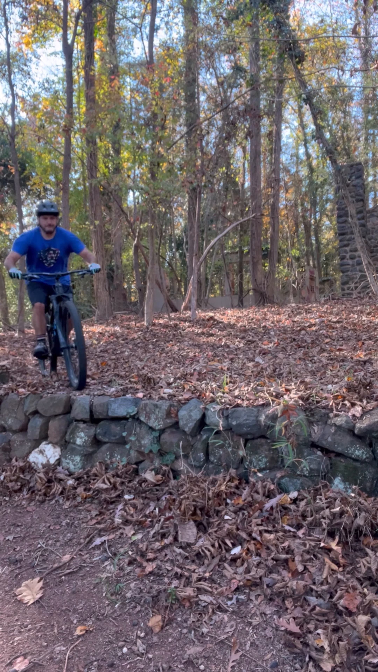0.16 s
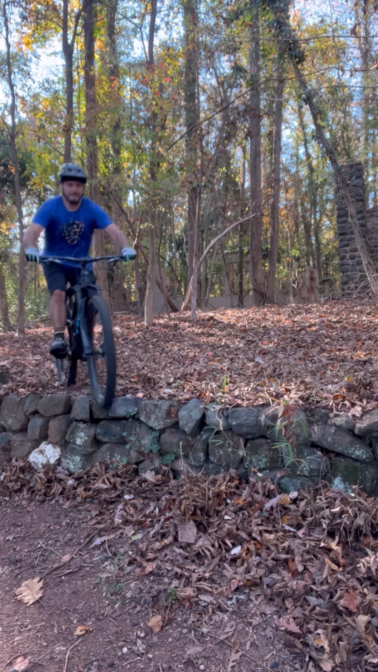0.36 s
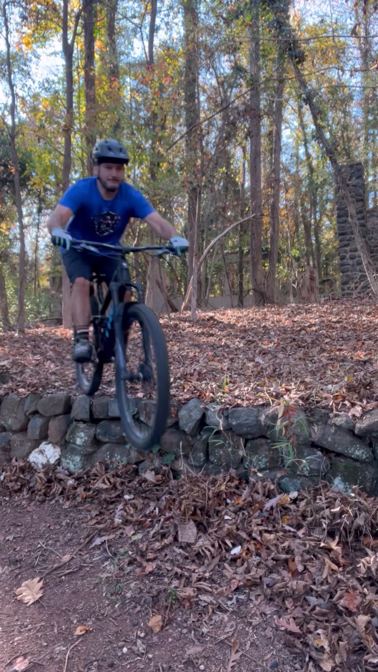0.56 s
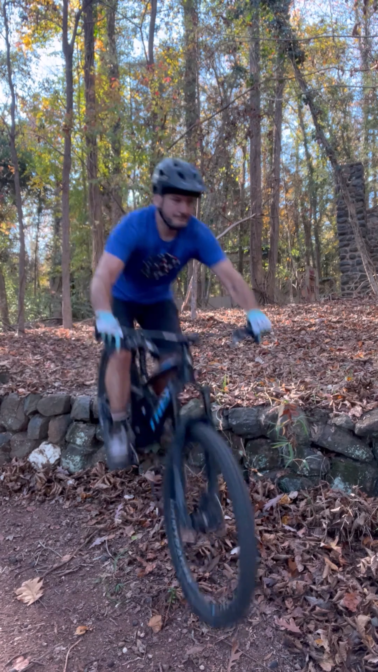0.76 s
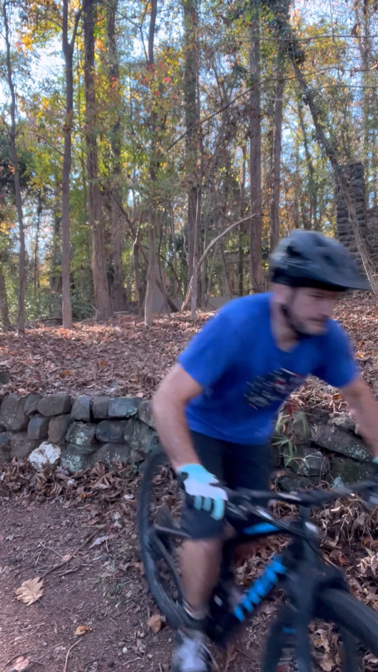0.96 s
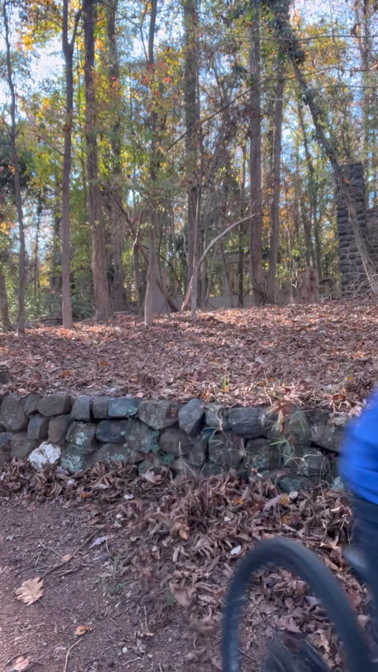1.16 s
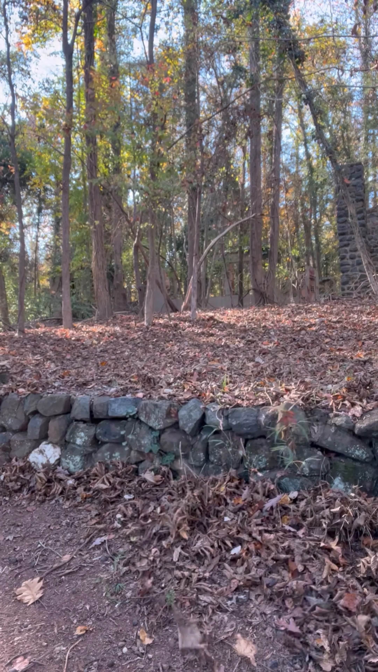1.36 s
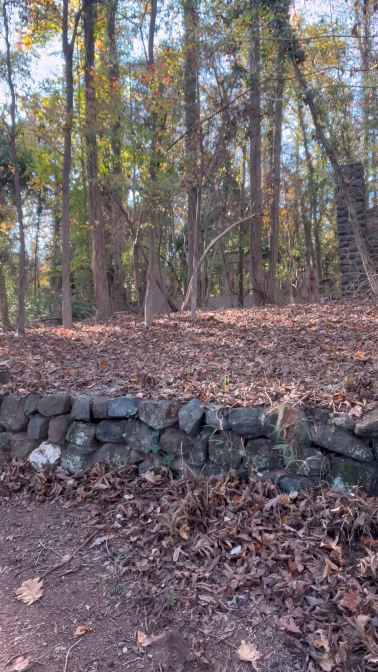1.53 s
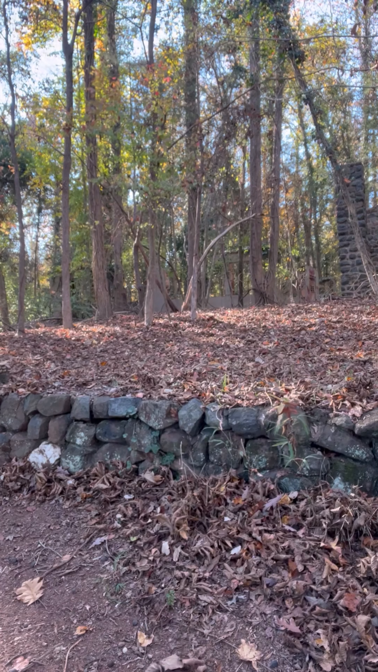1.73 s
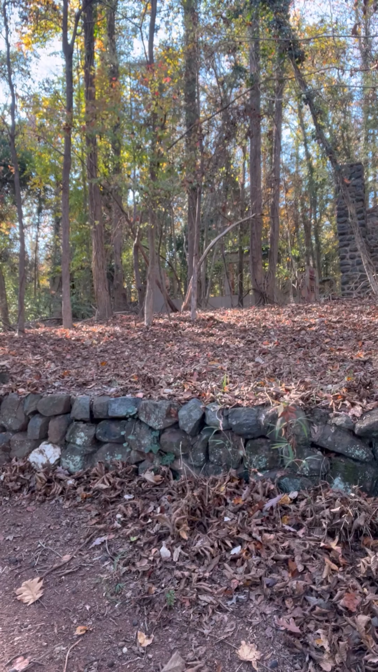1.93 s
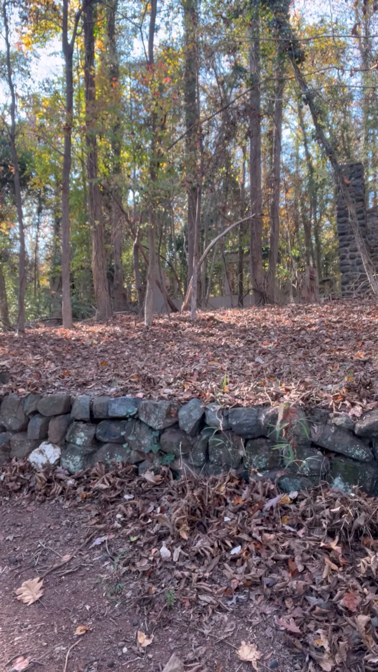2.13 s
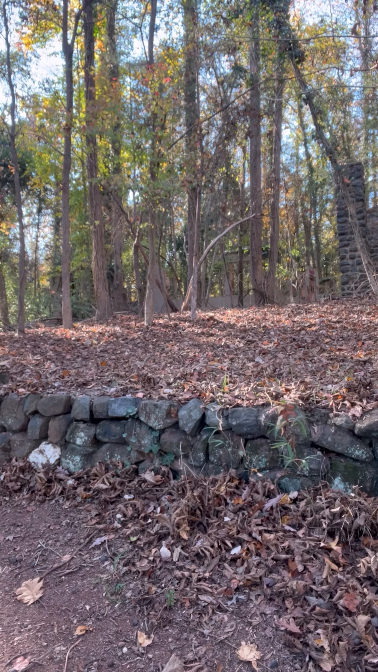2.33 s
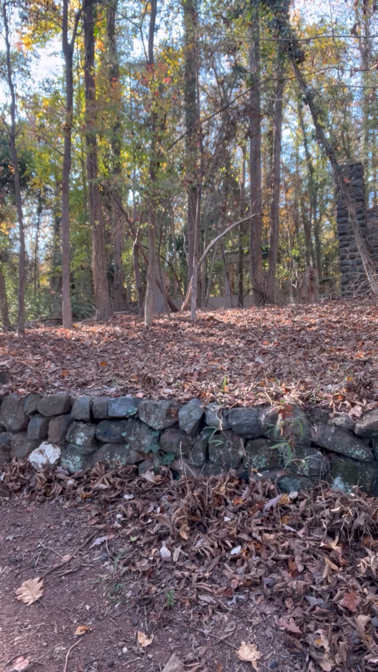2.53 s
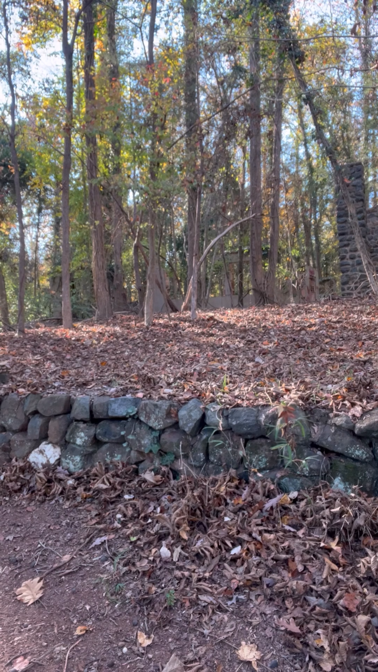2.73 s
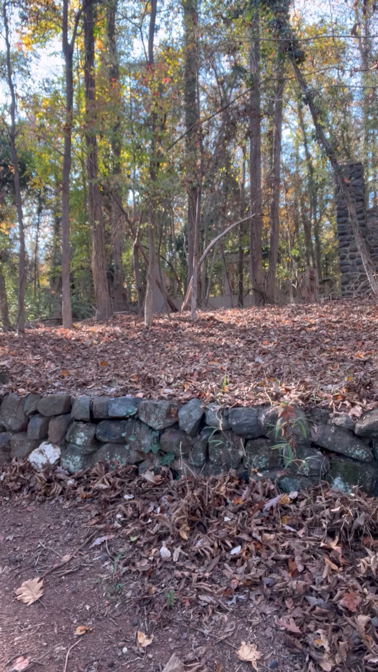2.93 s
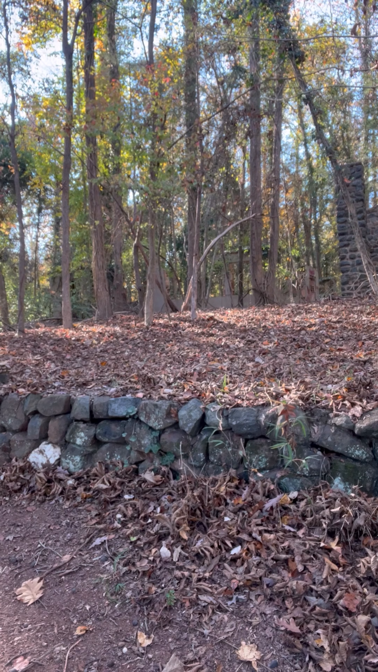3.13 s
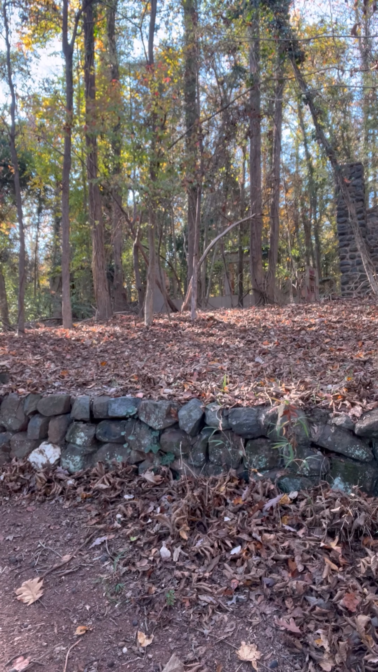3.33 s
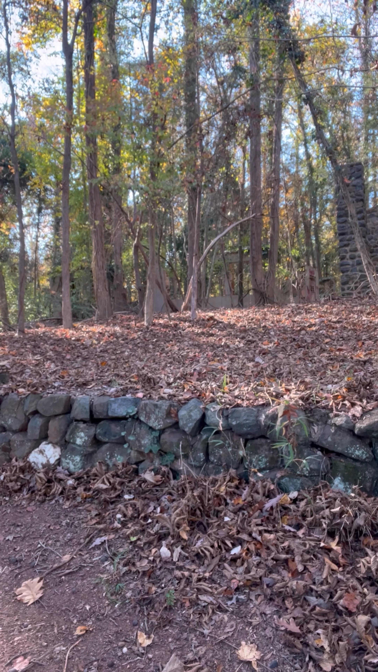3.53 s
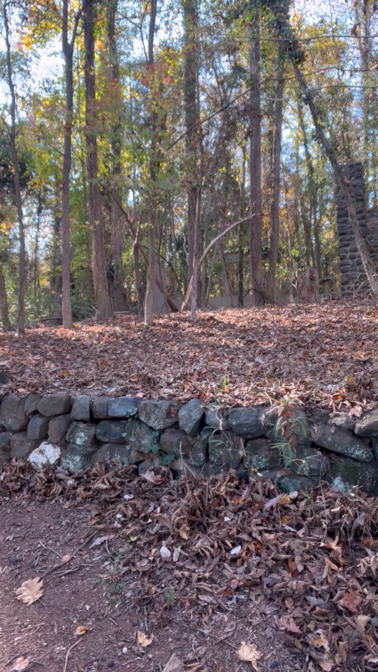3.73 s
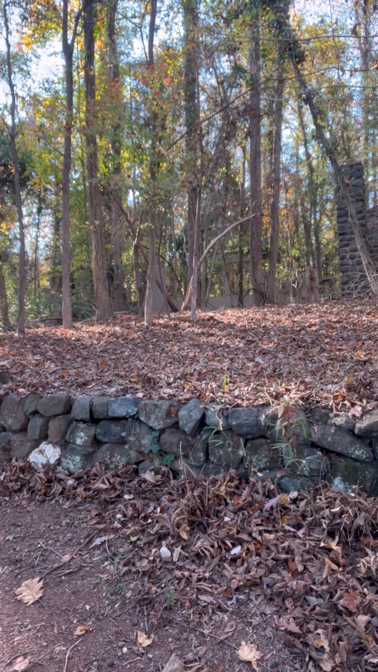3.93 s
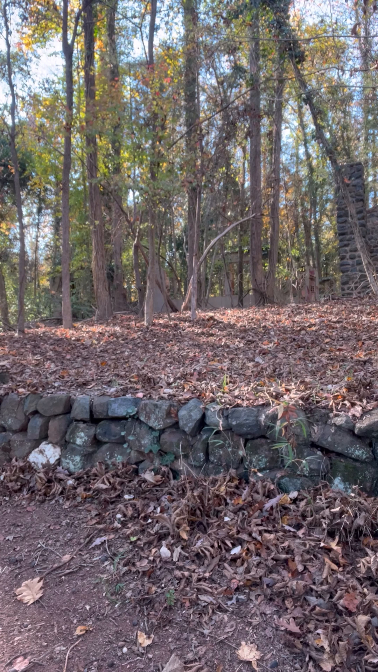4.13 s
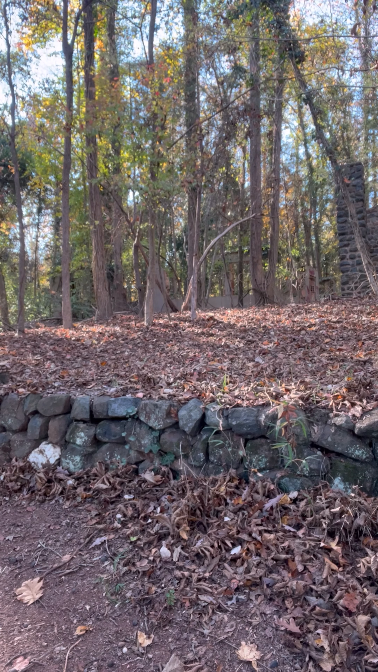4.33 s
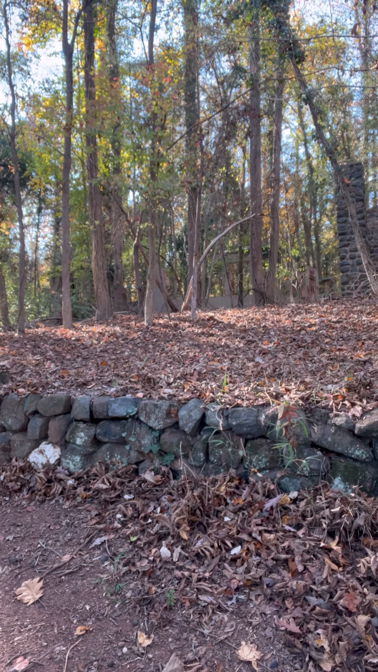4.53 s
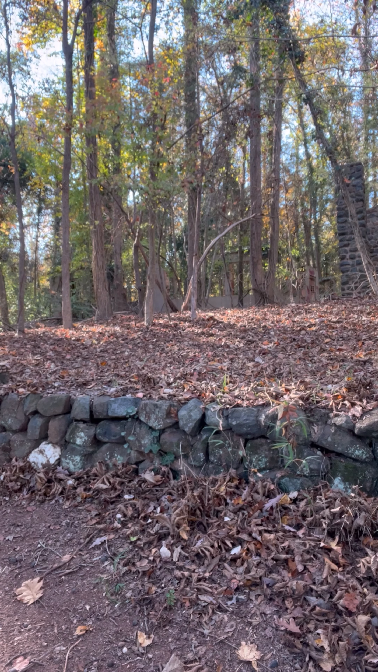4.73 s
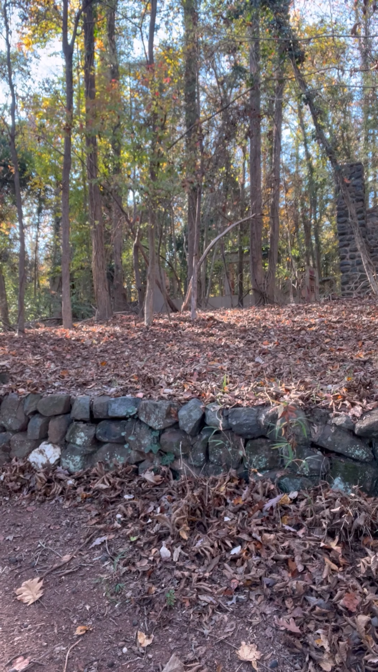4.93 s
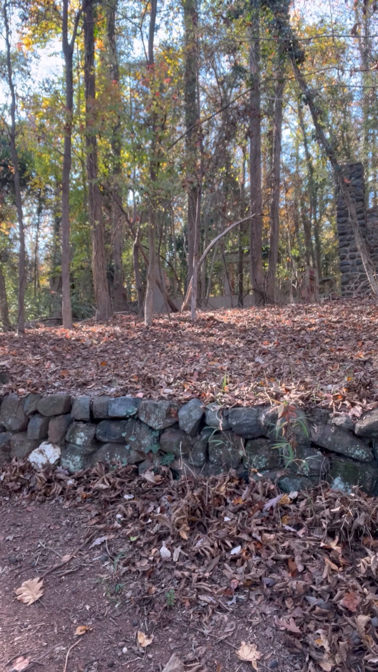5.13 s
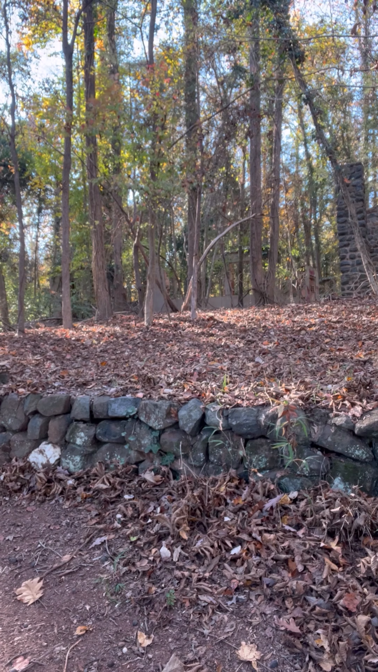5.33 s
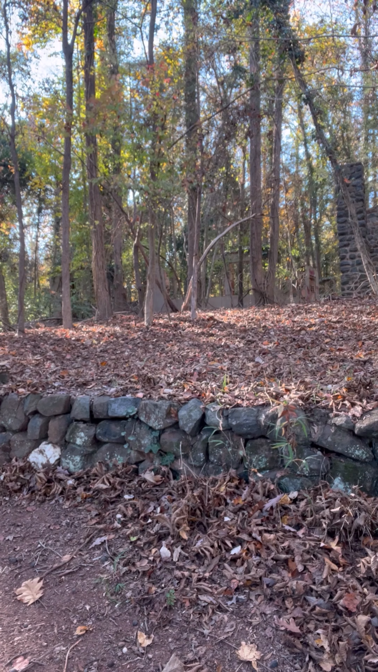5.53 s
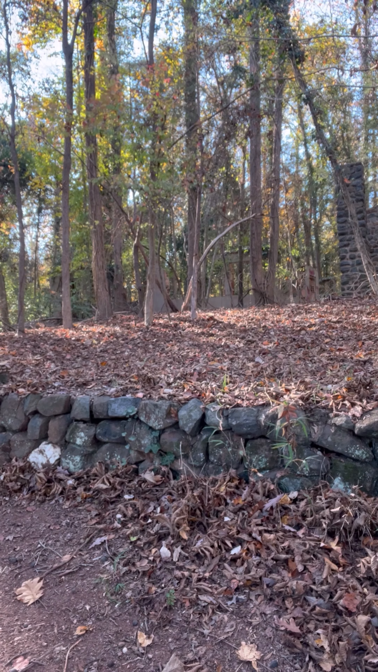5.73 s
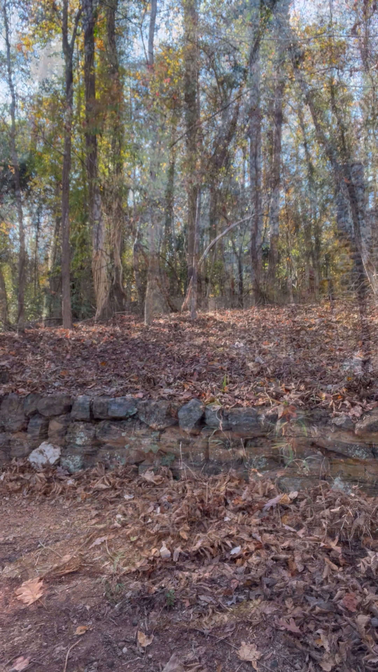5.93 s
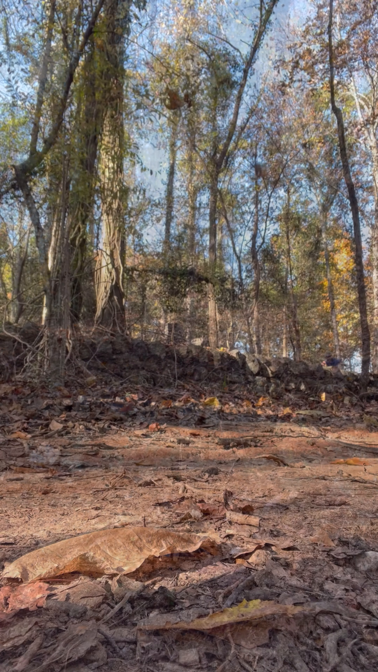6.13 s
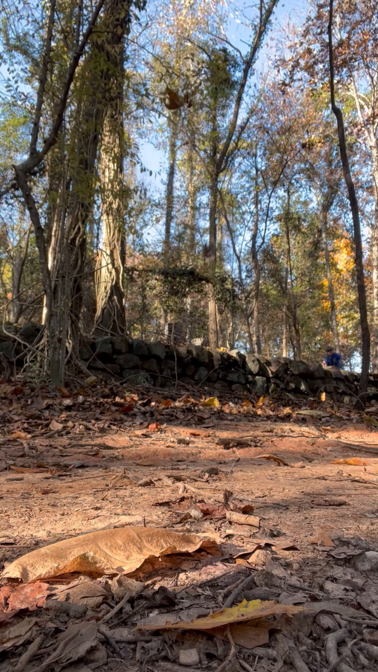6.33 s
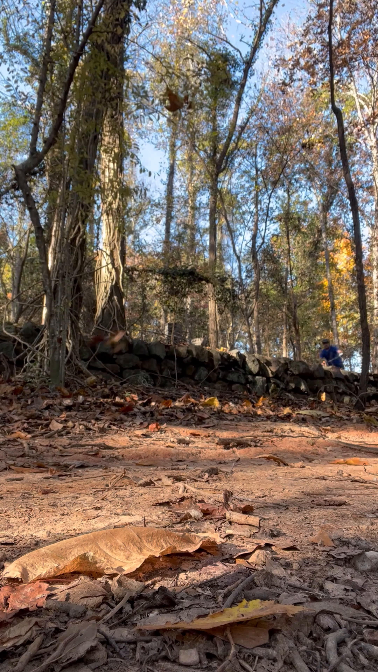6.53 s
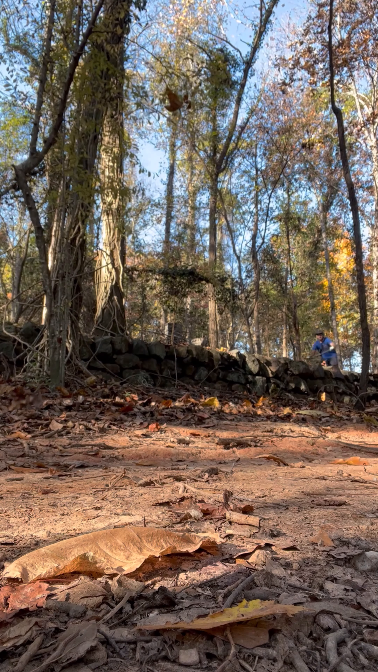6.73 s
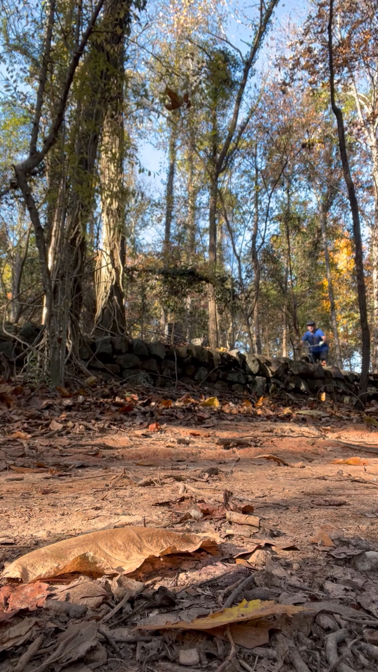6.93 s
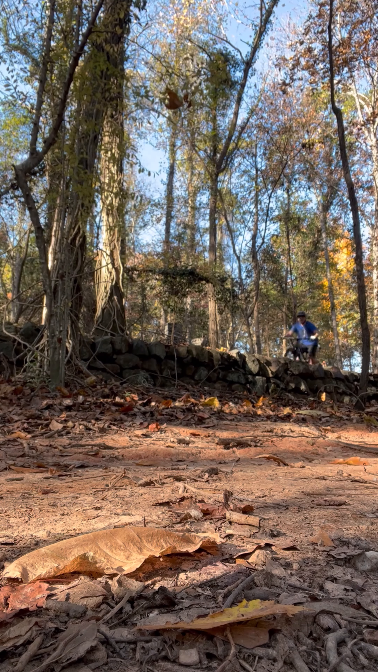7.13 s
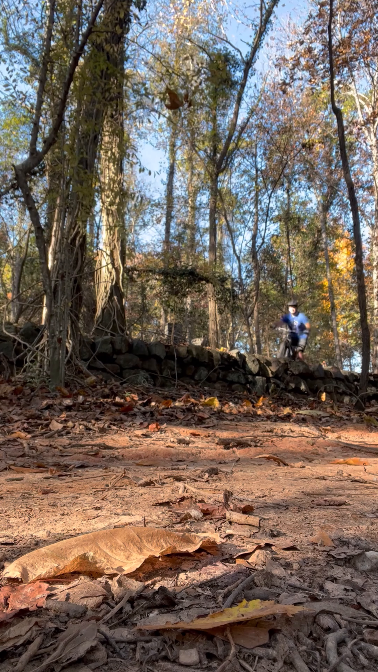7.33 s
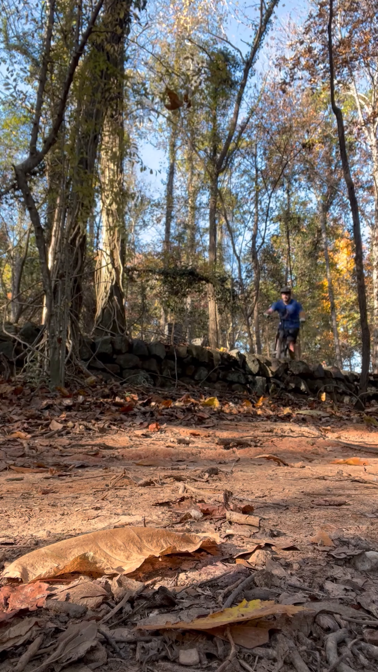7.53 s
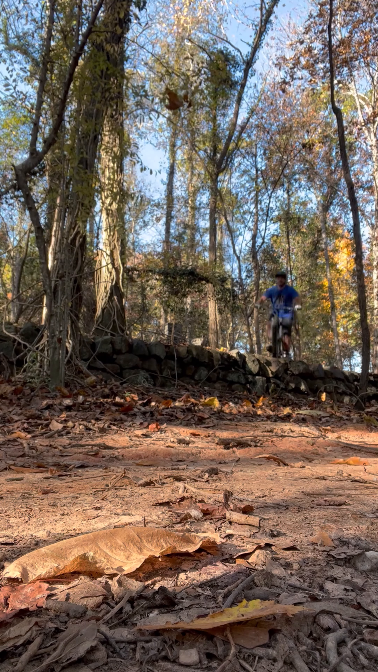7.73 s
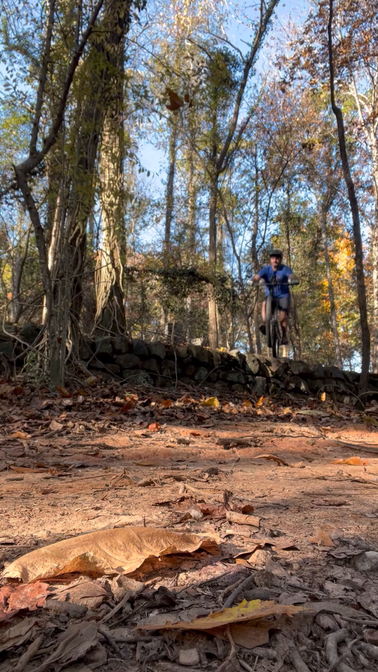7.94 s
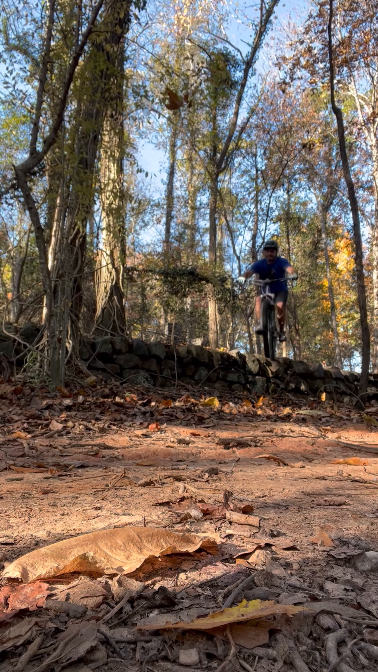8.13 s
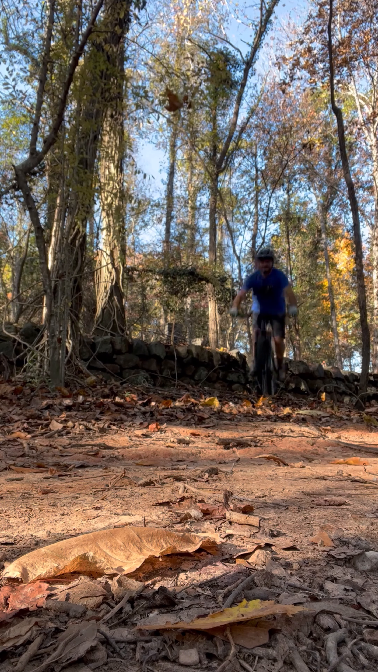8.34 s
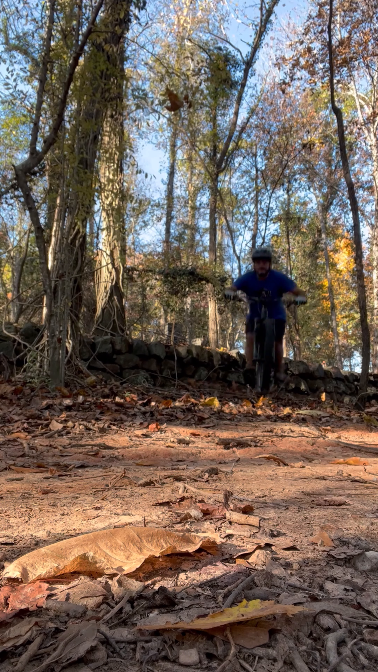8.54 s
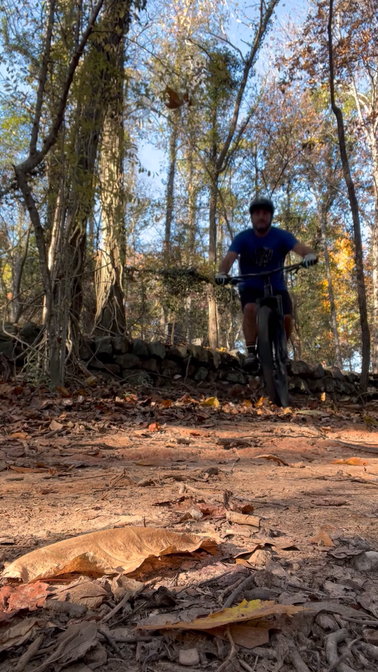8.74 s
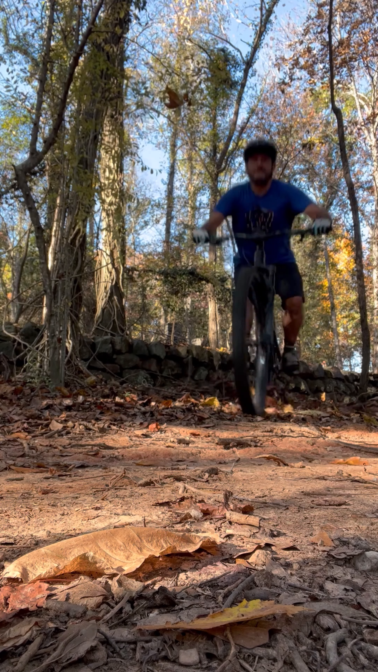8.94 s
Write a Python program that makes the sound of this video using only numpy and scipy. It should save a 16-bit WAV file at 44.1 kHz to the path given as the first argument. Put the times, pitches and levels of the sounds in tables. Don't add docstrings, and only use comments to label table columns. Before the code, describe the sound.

In an open wood, bike tyres rush through dry leaves from the start, crackling in swells near 0.15 and 0.4 seconds. At about 0.9 the bike drops off a stone wall: sticks snap, then a short deep thud lands at 0.95 with a dense clatter of chain, frame and stones until roughly 1.6. Rolling recedes, with a soft bump at 1.9 and small snaps around 2.4 and 2.75. Distant low traffic lingers, its engine hum growing towards 6, with very faint chirps at 3.5 and 4 to 4.8. Around 6 the perspective blends to ground level: a quiet, smooth leaf hiss, a sudden rustle at 6.7, and low wind buffets, strongest near 7.3. From 8.4 tyres plough into leaves close by in coarse, uneven crunches, with hollow tyre bumps and bright snaps at 8.8 to 8.95, ending at their loudest near 9.

```python
import sys
import numpy as np
from scipy import signal
from scipy.fft import rfft, irfft, next_fast_len
from scipy.io import wavfile
from scipy.ndimage import uniform_filter1d

SR = 44100
rng = np.random.default_rng(int(sys.argv[2]) if len(sys.argv) > 2 else 0)


def field_ratio(decibels):
    return 10 ** (np.asarray(decibels, dtype=float) / 20)


def persist_wave(psi):
    counts = np.round(np.clip(psi, -1, 1) * 32767).astype(np.int16)
    wavfile.write(sys.argv[1], SR, np.atleast_2d(counts).T)


N = 395577
SECONDS = np.arange(N) / SR
FILTER_SIZE = next_fast_len(N)

# pitch_hz, likeness_0_to_1, right_lead_radians, left_over_right_db
PORTS_NEAR = [(40, 0.8, -0.01, 0.3), (550, 0.6, 0.4, 1.2), (1800, 0.55, 1.3, 4.2), (2800, 0.25, 2.5, 1.2),
              (3100, 0.42, 3.3, 1.4), (3600, 0.26, 5.2, 1.6), (6000, 0.61, 5.11, 0.3),
              (9250, 0.83, 3.14, 0.0), (16000, 0.55, -1.2, 0.3)]
PORTS_AWAY = [(40, 0.84, -0.05, 0.0), (280, 0.59, -0.53, 1.2), (550, 0.55, -2.6, 2.8),
              (1800, 0.5, -4.5, 4.2), (3400, 0.25, -2.6, -1.2), (6000, 0.6, -1.22, -0.3),
              (9250, 0.72, -3.14, 0.0), (13400, 0.65, -6.2, 0.3), (16000, 0.34, -6.33, -0.2)]
PORTS_GROUND = [(40, 0.83, -0.25, -0.4), (950, 0.49, -0.75, 0.2), (2100, 0.22, -1.99, -1.4),
                (2800, 0.07, -4.33, 0.3), (3600, 0.27, -5.07, 0.4), (6000, 0.63, -4.13, -0.2),
                (7500, 0.33, -3.1, 0.0), (9000, 0.63, -1.8, 0.0), (13400, 0.62, 1.6, 0.0),
                (16000, 0.3, 2.4, 0.2)]
# start_s, end_s
TURN_AWAY = (1.63, 1.696)

# time_s, nearness_db, hollow_note_hz, brightness_db
RIDE = [(0.0, -79, 1550, 2), (.5, -53.5, 1590, 5.5), (.62, -60, 1730, 10), (.89, -50, 1720, 6),
        (1.13, -52, 1840, -12), (1.22, -47.5, 1590, -3), (1.28, -49.5, 2340, -13), (1.52, -48, 2320, 9),
        (1.62, -53, 2680, -1), (1.75, -55.5, 2630, 3.5), (2.4, -58.5, 2470, -2), (3.2, -63.5, 2100, -2),
        (3.65, -74, 2030, -2), (4.3, -74, 2020, -18), (4.55, -90, 2024, -9.5), (5.75, -90, 2020, -8)]
# peak_s, peak_db, rise_s, fall_s, brightness_db
DRIFTS = [(.156, -40.5, 0.4, 0.085, 0.5), (.268, -51, 0.017, .05, -17), (.426, -38.5, 0.11, 0.051, 1),
          (.624, -49.5, 0.021, 0.087, -1.5), (.904, -39, 0.0034, .05, -9.5), (.926, -29, 0.008, .14, 1),
          (1.21, -43, 0.092, .05, -3), (1.396, -39, 0.21, 0.15, 6.5), (1.548, -46.5, 0.027, .04, -19.5),
          (1.83, -53, 0.11, .2, -13), (2.43, -55, 0.049, 0.076, -1.5), (2.75, -54, 0.033, 0.077, -11),
          (3.79, -67.5, 0.055, .12, -1), (4.06, -75, .1, 0.18, 2.5), (4.48, -72, 0.093, .03, -4),
          (5.1, -81, .05, .07, 1)]
# pitch_hz, level_db
CRACKLE = [(1900, 0.0), (2550, -4.5), (3100, -2.5), (3900, -4), (5200, -8), (6500, -3.5), (8600, -5.5),
           (12000, -12.4), (15400, -11.6)]
# time_s, share_0_to_1
CRACKLE_DIP = [(1.1, 0.0), (1.4, .6), (1.7, .55), (1.95, 0.0)]
# start_s, peak_db, ring_hz, width_hz, die_away_s (by 60 dB)
KNOCKS = [(.9015, -20.5, 810, 290, 0.046), (.907, -29, 1900, 600, 0.027), (.94, -42, 1700, 700, 0.024),
          (1.019, -19.5, 935, 980, 0.081), (1.14, -24, 550, 120, 0.089), (0.99, -22, 1940, 650, 0.067),
          (1.105, -26.5, 540, 180, 0.074), (1, -41, 1500, 500, .04), (.934, -37, 1740, 780, 0.028),
          (.97, -32, 1720, 460, 0.039), (1.1, -26.5, 1800, 160, 0.044), (1.25, -29, 2400, 300, .1),
          (2.772, -40, 2000, 300, .08), (1.373, -27.5, 2180, 330, 0.15), (1.383, -22.5, 2600, 220, .08),
          (1.6, -29.5, 2010, 350, 0.087), (.9148, -22.5, 5500, 450, 0.11), (.9198, -23, 5450, 680, 0.11),
          (.943, -26, 5300, 400, 0.024), (.931, -27, 4700, 500, .06), (1.194, -23.5, 2030, 450, 0.08),
          (1.143, -27, 1900, 700, .05), (1, -27.5, 1100, 250, 0.13), (1.49, -31.5, 2300, 200, 0.1),
          (1.3, -31.5, 1200, 540, 0.038), (1.542, -28, 1900, 1100, 0.069), (1.556, -22.5, 990, 1200, 0.021),
          (1.79, -26, 740, 480, 0.076)]
# start_s, peak_db, ring_hz, die_away_s
SNAPS = [(0.6244, -35, 5740, 0.028), (0.9228, -18, 5530, 0.03), (0.9345, -18, 6020, 0.04),
         (.9405, -18, 5000, 0.036), (0.947, -31, 6190, 0.025), (0.9701, -21, 6470, 0.035),
         (0.9876, -21, 6220, 0.025), (0.9894, -16.5, 6170, 0.03), (1.0205, -20, 4294, 0.042),
         (1.027, -30, 5000, 0.039), (2.4194, -41, 4500, 0.04), (2.77, -43, 4600, 0.06),
         (2.738, -46, 5200, .08), (2.638, -47, 5000, .04), (2.401, -47, 4300, .04),
         (4.4712, -61, 6070, 0.035)]
# start_s, peak_db, pitch_hz, die_away_s
THUDS = [
    (0.95, -12, 51, 0.083),
    (.908, -27, 70, .15),
    (.995, -26.5, 143.6, 0.34),
    (1.196, -27.5, 1330, 0.19),
    (1.888, -27.5, 57, 0.11),
    (4.216, -26.5, 57, 0.078),
]
# middle_s, peak_db, pitch_hz, cycles
POPS = [(.2727, -19.5, 1380, 1.7), (.8992, -24, 2400, 2), (.9003, -25, 1200, 2.4), (.9023, -16, 1710, 1.2),
        (.9075, -19.5, 1160, 2), (.908, -23, 210, 1.2), (.9362, -29, 2600, 1.6), (.9408, -11, 3200, 1.5),
        (.9475, -19, 1500, 1.1), (.951, -21, 130, 1.1), (.967, -29, 120, 1.1), (.973, -23, 1900, 2.1),
        (.9825, -23, 2000, 4), (.9905, -15, 3000, 1.3), (1.0005, -26, 390, 1.5), (1.012, -23.5, 2600, 2.1),
        (1.032, -21, 1510, 1.2), (1.064, -30, 200, 2.1), (1.075, -27, 1160, 5), (1.086, -28.5, 1150, 4.5),
        (1.1, -24, 1990, 1.5), (1.1455, -23, 620, 1.5), (1.147, -26, 1500, 1.1), (1.192, -26, 500, 1.2),
        (1.243, -32, 530, 7), (1.303, -32, 270, 1.2), (1.44, -28, 350, 0.96), (1.465, -31.5, 2400, 3),
        (1.5506, -21, 1350, 0.7), (1.5587, -30, 900, 1.2), (1.64, -36.5, 2800, 8), (1.7, -42, 1100, 0.9),
        (1.8, -34, 108, 2.7), (1.842, -38.5, 2600, 8), (1.849, -34.5, 220, 2.1), (1.887, -27.5, 72, 1.1)]

# time_s, level_db
ROAD = [(0.0, -49), (.9, -45), (1.08, -41.5), (1.5, -41), (2.55, -45.5), (3.15, -48.5), (4.0, -46.5),
        (4.65, -44), (5.5, -41), (6.22, -43), (6.28, -47.5)]
# pitch_hz, level_db
ROAD_TONE = [(43, 1.5), (70, 12.5), (150, -2), (300, -10.5), (600, -7), (1100, -14.5), (1600, -20),
             (2050, -19), (2350, -31.5), (3300, -39), (5200, -51), (6500, -50.5), (8600, -55), (11000, -67)]
# pitch_hz, width_hz, level_db
ENGINES = [(67.7, 22, -9), (141, 14, -0.5), (204.3, 14, -3.5), (325, 40, -12)]
# time_s, level_db
ENGINES_NEAR = [(0.0, -55), (1.6, -51.5), (3.2, -57.5), (4.5, -54.5), (4.9, -45), (5.5, -46), (6.05, -41),
                (6.28, -45)]
# start_s, level_db, pitch_hz, length_s
CHIRPS = [(3.528, -48, 3480, 0.06), (4.056, -58.5, 4970, 0.12), (4.075, -56, 3150, 0.08),
          (4.136, -60, 3950, .14), (4.703, -55, 3680, 0.05), (4.11, -60, 3000, .1), (4.57, -66, 3700, .14),
          (4.76, -67, 3750, .1), (4.01, -64, 5550, .06)]

# time_s, leaf_hiss_db, brightness_db
APPROACH = [(5.77, -58.5, -8), (6.36, -60, -9), (6.9, -57.5, -5.5), (8.23, -58.5, -1), (8.42, -61, 5)]
# peak_s, peak_db, rise_s, fall_s, brightness_db
FAR_DRIFTS = [
    (5.78, -63, 0.0089, 0.033, -3),
    (6.72, -53.5, 0.007, 0.12, 1),
    (7.11, -64, .2, 0.027, 7.5),
    (7.53, -60, 0.26, 0.044, 3),
    (7.8, -58, .02, 0.45, -4),
]
# pitch_hz, level_db
HISS = [(43, -0.8), (70, -0.1), (150, -12), (300, -10.5), (600, -12.5), (1100, -17.5), (1900, -14.5),
        (2600, -12.5), (3300, -15), (5200, -16.5), (6500, -17), (8600, -22), (12000, -25), (15400, -19)]
# peak_s, peak_db, rise_s, fall_s, brightness_db
PLOUGH = [(8.41, -56, 0.0029, .05, -8), (8.434, -36, 0.0054, 0.02, 11), (8.5, -43, .04, 0.036, -2),
          (8.566, -36.5, 0.062, 0.081, -5), (8.61, -37, 0.026, 0.031, 0), (8.69, -47, .04, .04, 6),
          (8.745, -43, 0.046, 0.04, -2.5), (8.8, -45, 0.021, 0.026, -4), (8.865, -35.5, 0.0092, 0.042, 6),
          (8.828, -34, 0.012, 0.045, -1), (8.97, -30, 0.13, .1, 9.5)]
# pitch_hz, level_db
CRUNCH = [(150, 0.0), (300, -0.5), (600, -1.5), (1100, -6.5), (1800, -8), (2150, -15), (2700, -10.5),
          (3300, -11.5), (5200, -11), (6500, -10.5), (8600, -3.5), (12000, -9.5), (15400, -12)]
# start_s, peak_db, ring_hz, die_away_s
GROUND_KNOCKS = [(6.7144, -45, 1780, 0.04), (6.7216, -39, 1490, 0.092), (6.7526, -38, 3380, 0.037),
                 (6.7944, -40, 2710, 0.04), (7.6251, -49, 1350, 0.047), (7.8037, -44, 1070, 0.073),
                 (7.8794, -43, 1090, 0.054), (8.0924, -45, 4470, 0.04), (8.4085, -32.5, 900, 0.05),
                 (8.4262, -43, 1100, 0.04)]
# start_s, peak_db, ring_hz, width_hz, die_away_s
GROUND_SNAPS = [(6.714, -34, 10000, 4000, .03), (6.721, -35, 9400, 4400, 0.046),
                (6.73, -41, 10000, 6000, .06), (6.8, -47, 10500, 4000, .05),
                (8.825, -21.5, 13000, 1300, 0.053), (8.826, -24, 9450, 3970, 0.042),
                (8.862, -23.5, 9900, 3000, 0.046), (8.916, -20, 10500, 3880, .02),
                (8.9207, -15, 10100, 4000, 0.018), (8.9216, -17, 9700, 5000, .02),
                (8.9203, -22, 4500, 2500, .02), (8.8245, -26, 1740, 370, 0.046),
                (8.823, -27, 1020, 370, 0.044), (8.833, -28, 500, 180, .06), (8.555, -31, 1060, 500, .08),
                (8.912, -28, 1700, 400, 0.033)]
# middle_s, peak_db, pitch_hz, cycles
GROUND_POPS = [(7.252, -40.5, 66, 2.17), (7.38, -39, 92, 1.3), (7.518, -35.5, 94, 1.8),
               (7.577, -40.5, 116, 2.3), (8.379, -34.5, 61, 1.4), (8.772, -34.5, 84, 1.5),
               (8.872, -31, 84.06, 1.3), (6.7, -41, 110, 1.2), (7.79, -42.5, 110, 2.5),
               (8.478, -30, 221, 2.1), (8.625, -35, 203, 5.5), (8.437, -29, 260, 1.7),
               (8.548, -30.5, 194, 4.1), (8.575, -32.5, 220, 3.5), (8.56, -26, 480, 2.3),
               (8.829, -29, 517, 4.2), (8.818, -28, 1050, 3.5), (8.419, -36.5, 490, 2.9),
               (8.496, -33, 410, 1.5), (8.512, -35, 202, 2.7), (8.537, -29, 400, 1.4),
               (8.566, -35, 300, 1.5), (8.719, -32, 290, 1.4), (8.76, -35, 150, 2), (8.797, -38, 525, 2.4),
               (8.875, -32, 480.4, 2.2), (8.896, -28, 440, 1.8), (8.915, -31, 410, 2), (6.5, -42, 150, 1.4),
               (7.41, -41, 200, 1.5), (7.372, -41, 190, 1.5), (7.487, -42, 60, 1.3), (7.71, -44, 170, 1.3),
               (7.578, -44, 240, 1.3), (7.545, -44, 200, 1.3), (8.3, -45, 130, 1.7), (6.846, -43, 150, 1.2),
               (8.411, -36, 630, 1.2), (8.952, -28, 665, 1.8), (8.538, -32, 1000, 2.5),
               (8.61, -33, 500, 1.5), (8.935, -34, 1300, 2), (8.465, -34, 220, 2), (8.64, -38, 206, 4)]
# peak_s, peak_db, rise_s, fall_s
WIND = [(6.3, -56, .1, 0.76), (6.55, -56.5, 0.14, 0.091), (6.7, -53, 0.044, 0.031),
        (6.84, -54, 0.027, 0.036), (7.13, -53, 0.018, 0.034), (7.25, -46.5, 0.019, 0.13),
        (7.39, -47, 0.04, 0.035), (7.5, -50, 0.024, 0.1), (7.7, -52, .05, .1), (7.89, -61.5, 0.027, .02),
        (8.05, -62, 0.081, 0.092), (8.37, -48.5, 0.09, 0.1), (8.77, -48, 0.022, .02)]


def evened(x):
    return x / np.sqrt(np.mean(x ** 2) + 1e-20)


def between(span):
    inside = (SECONDS >= span[0]) & (SECONDS <= span[-1])
    return uniform_filter1d(inside * 1., size=300, mode="nearest")


def columns(rows):
    time_s, *values = np.transpose(rows)
    return between(time_s), [np.interp(SECONDS, time_s, v) for v in values]


def colour(x, points, edge_db=-40):
    below = (points[0][0] / 2, points[0][1] + edge_db)
    pitch_hz, db = np.transpose([below] + list(points))
    hz = np.fft.rfftfreq(FILTER_SIZE, 1 / SR)
    gain = field_ratio(np.interp(np.log(hz + 1), np.log(pitch_hz), db))
    return evened(irfft(rfft(x, FILTER_SIZE) * gain, FILTER_SIZE)[:N])


def resonate(x, hz, width_hz):
    turn = np.exp(2j * np.pi * np.cumsum(hz * np.ones(x.shape[-1])) / SR)
    r = np.exp(-np.pi * width_hz / SR)
    return 2 * (turn * signal.lfilter([1 - r], [1, -r], x / turn)).real


def resonate_twice(x, hz, width_hz, second_width_hz):
    return evened(resonate(resonate(x, hz, width_hz), hz, second_width_hz))


def add(mix, start_s, sound):
    part = mix[round(start_s * SR):][:len(sound)]
    part += sound[:len(part)]


def slow(rate_hz):
    b, a = signal.butter(2, rate_hz, fs=SR)
    return evened(signal.lfilter(b, a, rng.standard_normal(N)))


def swells(rows, *dull):
    power = np.zeros((max(len(dull), 1), N))
    for peak_s, db, rise_s, fall_s, *bright_db in rows:
        first = max(round((peak_s - 5 * rise_s) * SR), 0)
        near = slice(first, round((peak_s + 5 * fall_s) * SR))
        late = SECONDS[near] - peak_s
        steps = np.maximum(-late / max(rise_s, .002), late / max(fall_s, .002))
        shape = field_ratio(db - 10 * steps)
        tip = field_ratio(-np.outer(dull or [0], bright_db or [0]))
        power[:, near] += (shape * tip) ** 2
    return power


def leaves(per_s, spread_db, wash, clump_db):
    spreads = np.minimum(rng.exponential(1, N), 2.9)
    size = field_ratio(spread_db * spreads) * rng.choice([-1., 1.], N)
    clicks = evened(size * (rng.random(N) < per_s / SR))
    clumps = field_ratio(clump_db * slow(rate_hz=7.4))
    return evened((clicks + wash * rng.standard_normal(N)) * clumps)


def pops(rows):
    out, t = np.zeros(N), np.arange(-2200, 2200) / SR
    for middle_s, db, hz, cycles in rows:
        bell = np.exp(-(2 * hz * t / cycles) ** 2)
        add(out, middle_s + t[0], -field_ratio(db) * np.cos(2 * np.pi * hz * t) * bell)
    return out


def widened(rows, width_hz):
    return [(s, db, hz, width_hz, die_s) for s, db, hz, die_s in rows]


def knocks(rows):
    out, t = np.zeros(N), np.arange(4000) / SR
    for start_s, db, hz, width_hz, die_s in rows:
        ring = resonate_twice(rng.standard_normal(len(t)), hz, width_hz, 2 * width_hz)
        fade = field_ratio(db - 3.5 - 60 * t / max(die_s, .004))
        add(out, start_s, fade * ring * np.minimum(t / 0.00039, 1))
    return out


def thuds(rows):
    out, t = np.zeros(N), np.arange(12000) / SR
    swell = np.minimum(t / .002, 1)
    for start_s, db, hz, die_s in rows:
        turns = hz * t + .25 * (1 - np.exp(-t / .007))
        add(out, start_s, -field_ratio(db - 60 * t / die_s) * swell * np.sin(2 * np.pi * turns))
    return out


def first_ride():
    inside, (near_db, hollow_hz, bright_db) = columns(RIDE)
    alike_db = -45
    hollow_dull, drum_dull = 0.4, 0.75
    steady_db = [near_db,
                 near_db + bright_db,
                 alike_db + 0.89 * (near_db - alike_db) - hollow_dull * bright_db,
                 alike_db + 0.4 * (near_db - alike_db) - drum_dull * bright_db]
    drift_power = swells(DRIFTS, 0, -1.36, hollow_dull, drum_dull)
    gains = np.sqrt(field_ratio(np.array(steady_db)) ** 2 + drift_power)
    grains = leaves(per_s=5000, spread_db=3.5, wash=1.0, clump_db=0.5)
    landed = SECONDS >= 0.96

    crackle = colour(grains, CRACKLE[1:-2] + [(10500, -34.0), (12500, -27)], edge_db=-63.0)
    crackle = evened(crackle + 0.064 * np.roll(crackle, 21))
    shade = np.interp(SECONDS, *np.transpose(CRACKLE_DIP))
    crackle = crackle - shade * resonate(crackle, 4500, 1500)

    fizz_tone = [(9500, 1.6), (10800, 1.8), (12200, -6.5), (14000, 0.0), (15700, 2.5)]
    fizz = colour(grains, fizz_tone, edge_db=-57.0)

    wide = resonate_twice(grains, hollow_hz, 1260, 1500)
    tight = resonate_twice(grains, hollow_hz, 520, 560)
    share = np.clip((hollow_hz - 1950) / 700, 0, .75)
    hollow = (1 - share) * wide + share * tight
    dip_hz = np.where(landed, 3700, hollow_hz + 900)
    hollow = evened(hollow - 0.7 * resonate(hollow, dip_hz, 800))
    hollow = hollow * field_ratio(0.9 * slow(rate_hz=17))

    drum_tone = [(200, 5.5), (520, 5.0), (1000, -3.5), (1600, -12.5), (3000, -54)]
    drum = colour(grains, drum_tone, edge_db=-4.5)
    drum = drum * np.where(landed, 1, field_ratio(-6.5))

    layers = field_ratio(np.array([[5.0], [3.0], [4.0], [-0.6]])) * np.array([crackle, fizz, hollow, drum])
    rolling = inside * (gains * layers).sum(0)
    hits = knocks(KNOCKS + widened(SNAPS, width_hz=1900)) + thuds(THUDS) + pops(POPS)
    return rolling, hits


def engines():
    hums = np.zeros(N)
    for hz, width_hz, db in ENGINES:
        hums += field_ratio(db) * resonate_twice(rng.standard_normal(N), hz, width_hz, 2 * width_hz)
    return hums * field_ratio(columns(ENGINES_NEAR)[1][0])


def road():
    inside, (level_db,) = columns(ROAD)
    wash = colour(rng.standard_normal(N), ROAD_TONE[2:], edge_db=-11.0)
    wash = wash * field_ratio(level_db + 1.5 + 0.13 * slow(rate_hz=10.0))
    drone = colour(rng.standard_normal(N), ROAD_TONE[:2] + [(110, -10.5), (200, -62.0)], edge_db=-35)
    drone_db = -48.5 - 0.82 * SECONDS
    drone = drone * field_ratio(drone_db + 3.0 + 1.8 * slow(rate_hz=8.3))
    return inside * (wash + engines() + drone)


def birds():
    out = np.zeros(N)
    for start_s, db, hz, length_s in CHIRPS:
        t = np.arange(0, length_s, 1 / SR)
        fade = np.minimum(t / 0.0065, 1) * field_ratio(-21 * np.sqrt(t / length_s))
        burr = 1 + 0.25 * np.sin(2 * np.pi * 90 * t)
        tone = np.sin(2 * np.pi * hz * t * (1.01 - 0.015 * t / length_s))
        add(out, start_s, field_ratio(db) * fade * burr * tone)
    return out


def far_leaves():
    inside, (hiss_db, bright_db) = columns(APPROACH)
    steady_db = np.array([hiss_db, hiss_db + bright_db])
    gains = np.sqrt(field_ratio(steady_db) ** 2 + swells(FAR_DRIFTS, 0, -0.57))
    fine = leaves(per_s=7000, spread_db=-2.5, wash=0.97, clump_db=0.6)
    hiss = colour(fine, HISS[2:-2] + [(10500, -39.0), (12500, -52)], edge_db=-4.0)
    air_tone = [(9800, 4), (11000, 0.0), (12200, -3.5), (14500, -2.0), (15900, -2.5)]
    air = colour(fine, air_tone, edge_db=-24)
    return inside * (field_ratio(6.0) * gains[0] * hiss + field_ratio(4.0) * gains[1] * air)


def close_leaves():
    steady_power = between((8.42, 8.97)) * field_ratio(-44.5) ** 2
    gains = np.sqrt(steady_power + swells(PLOUGH, 0, 1.07, 0.25))
    grains = leaves(per_s=4300, spread_db=3.0, wash=1.0, clump_db=1.5)
    crunch = colour(grains, CRUNCH[3:-3] + [(8500, -36), (10500, -42)], edge_db=-12.5)
    casing = evened(resonate(grains, 210, 67))
    thump = colour(grains, CRUNCH[1:3] + [(1000, -16.5), (2000, -43)], edge_db=-31)
    drum = 0.48 * casing + 0.67 * thump
    fizz = colour(grains, [(7000, -13.0)] + CRUNCH[-3:] + [(15900, -4.5)], edge_db=-70)
    return field_ratio(0.5) * gains[0] * crunch + field_ratio(-2.5) * gains[1] * drum + field_ratio(5.0) * gains[2] * fizz


def wind():
    gusts = np.sqrt(field_ratio(-69) ** 2 + swells(WIND)[0])
    tone = [(42, -1.0), (70, 1.0), (130, -4.5), (260, -13), (600, -59.0)]
    lumps = colour(rng.standard_normal(N), tone, edge_db=-30)
    return between((6.27, 8.97)) * field_ratio(3.5) * gusts * lumps


def second_ride():
    hits = knocks(widened(GROUND_KNOCKS, width_hz=1300) + GROUND_SNAPS) + pops(GROUND_POPS)
    return far_leaves() + close_leaves() + wind(), hits


def ports(x, hits, table):
    spectra = signal.stft(x, nperseg=512, noverlap=384)[2]
    chance = np.exp(2j * np.pi * rng.random(spectra.shape))
    shuffled = signal.istft(spectra * chance, nperseg=512, noverlap=384)[1][:N]
    direct = rfft(x, FILTER_SIZE)
    scattered = rfft(evened(shuffled) * np.std(x), FILTER_SIZE)
    sharp = rfft(hits, FILTER_SIZE)
    pitch_hz, likeness, lead, balance_db = np.transpose(table)
    hz = np.fft.rfftfreq(FILTER_SIZE, 1 / SR)
    same = np.interp(hz, pitch_hz, likeness) ** .58
    same = 1 - (1 - same) * np.clip(60 / (hz + 1), .9, 1.6)
    tilt = field_ratio(np.interp(hz, pitch_hz, balance_db) / 2)
    turn = np.exp(1j * np.interp(hz, pitch_hz, lead))
    left = direct + sharp
    right = turn * (same * direct + sharp) + np.sqrt(1 - same ** 2) * scattered
    return irfft(np.array([left * tilt, right / tilt]), FILTER_SIZE)[:, :N]


def scene():
    away = np.interp(SECONDS, TURN_AWAY, (0, np.pi / 2))
    rolling, hits = first_ride()
    passing = ports(rolling * np.cos(away), hits * np.cos(away), PORTS_NEAR)
    leaving = ports(rolling * np.sin(away) + road() + birds(), hits * np.sin(away), PORTS_AWAY)
    return passing + leaving + ports(*second_ride(), PORTS_GROUND)


def band_limit(x):
    return signal.sosfilt(signal.butter(12, 16620, fs=SR, output="sos"), x)


def record(dry):
    b, a = signal.butter(3, 33, "high", fs=SR)
    edge = signal.firwin(801, 15730, window=("kaiser", 9), fs=SR)
    mix = signal.oaconvolve(signal.lfilter(b, a, dry), edge[None], "same")
    return band_limit(mix)


dry = scene()
out = record(dry)
persist_wave(out)
```